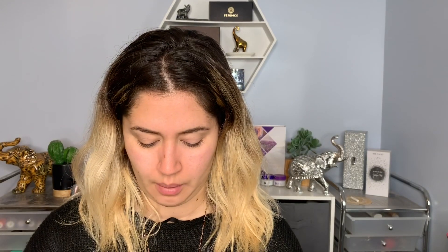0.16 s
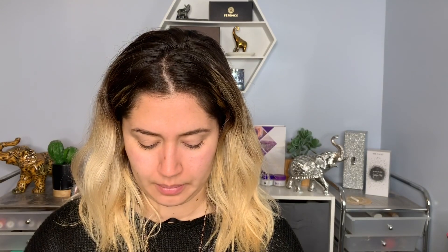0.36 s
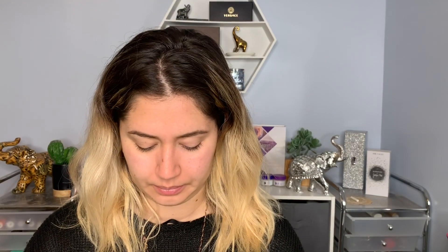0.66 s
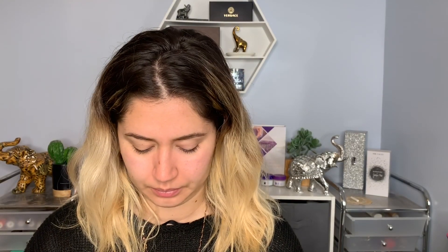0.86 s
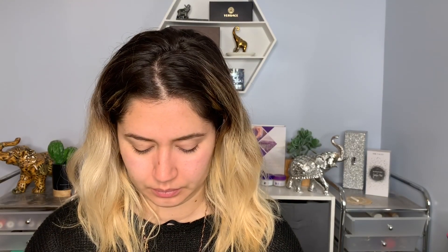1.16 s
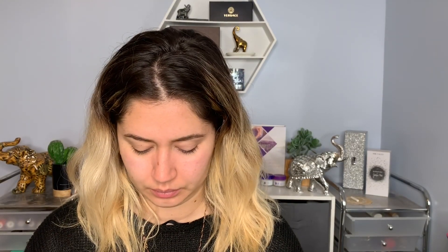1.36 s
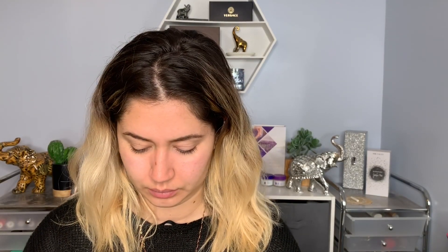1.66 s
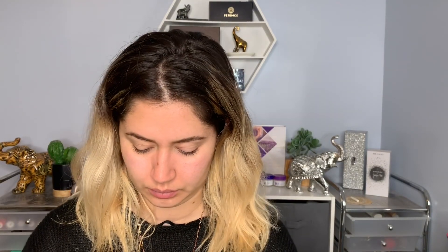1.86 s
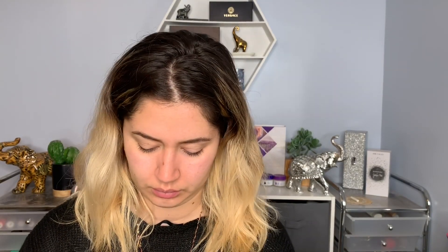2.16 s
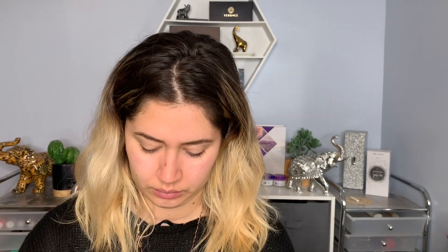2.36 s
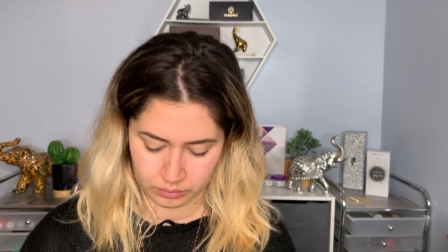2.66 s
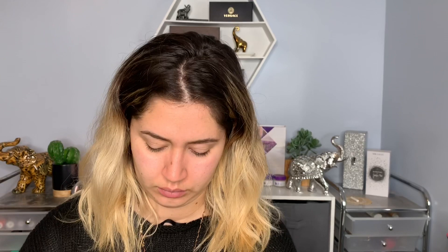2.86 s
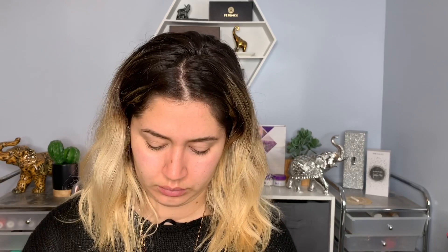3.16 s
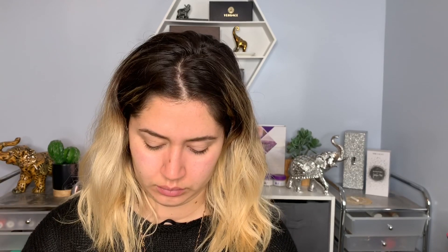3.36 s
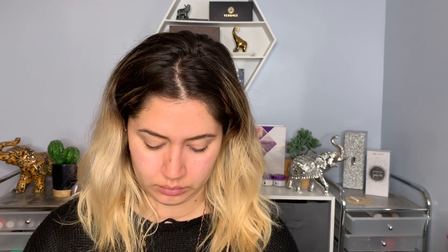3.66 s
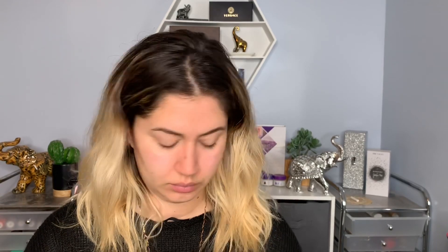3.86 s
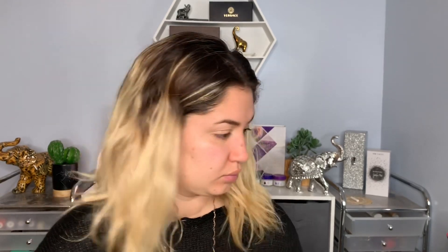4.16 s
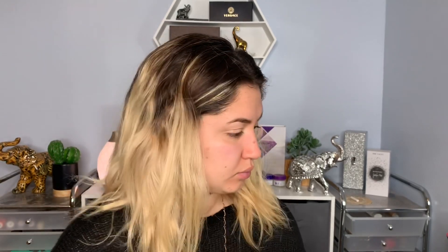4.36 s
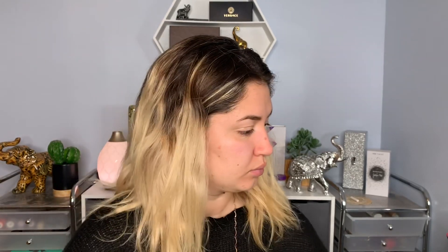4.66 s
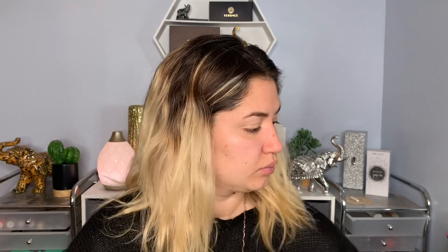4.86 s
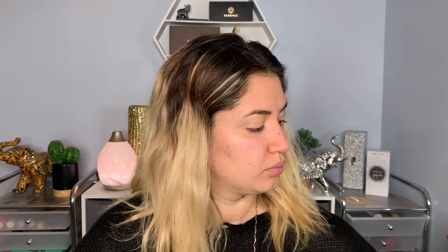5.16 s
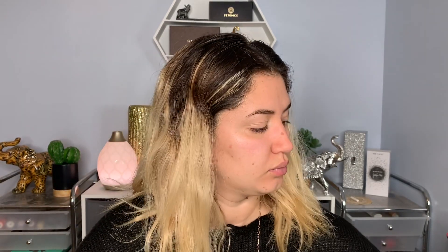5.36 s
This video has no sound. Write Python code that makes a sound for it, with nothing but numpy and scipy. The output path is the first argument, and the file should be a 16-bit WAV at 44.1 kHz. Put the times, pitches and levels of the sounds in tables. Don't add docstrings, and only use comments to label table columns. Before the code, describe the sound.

A quiet furnished room with faint, steady ventilation hum and a little microphone hiss. A barely audible tick opens it; at about 0.3 s a small plastic lid snaps off in a crisp cluster of clicks, rattling loose until 0.5 s. Near-silence follows, with a tiny tick at 1.6 s and a soft dull bump at 1.7 s. From 2.2 to 2.9 s a fingertip taps the jar six times, evenly, hollow and low with slight nail brightness and very faint skin squeaks. A soft hand or sleeve slide rises from 3 s to a firm set-down knock at 3.4 s. From 3.55 to 4 s the jar rocks on the desk in a hard clatter, the loudest event, landings coming ever faster before it stops. Hum alone remains until faint clicks at 5.2 s, then a short slide and small clinks at 5.4-5.5 s. Close stereo camera microphone, short room reflections.

```python
import sys
import numpy as np
from scipy import signal
from scipy.fft import rfft, irfft
from scipy.io import wavfile
from scipy.ndimage import uniform_filter1d

SR = 44100
rng = np.random.default_rng(int(sys.argv[2]) if len(sys.argv) > 2 else 0)


def file_out(sig):
    cols = np.atleast_2d(sig).T
    lim = np.clip(cols, -1, 1)
    pcm = np.round(lim * 32767).astype(np.int16)
    wavfile.write(sys.argv[1], SR, pcm)


def invert_db(level):
    return 10 ** (np.asarray(level, dtype=float) / 20)


N = 243192
SIZE = 8192
HZ = np.fft.rfftfreq(SIZE, 1 / SR)

# start_s, peak_db, pitch_hz (favoured)
LID_SNAPS = [(.321, -47, 3050), (.3282, -24, 3250), (.3305, -31, 5300), (.3345, -30.5, 3120),
             (.3365, -32, 500), (.342, -40, 4800), (.346, -38, 1250), (.351, -41, 5300), (.353, -36, 2900),
             (.356, -60, 400), (.360, -45.5, 3200), (.366, -54, 3200), (.374, -51, 1850), (.385, -46, 1250)]
ROCK_CONTACTS = [(3.5665, -18.5, 1390), (3.5677, -22.5, 2400), (3.5695, -20.5, 2440), (3.572, -23, 3060),
                 (3.5745, -24.5, 1390), (3.576, -26, 1070), (3.582, -26, 706), (3.589, -52, 1390),
                 (3.636, -25, 2170), (3.638, -14.5, 2170), (3.6425, -21, 1070), (3.6455, -38, 3060),
                 (3.652, -32, 1390), (3.672, -45, 2170), (3.6965, -19, 1390), (3.6995, -22, 1390),
                 (3.704, -27.5, 720), (3.708, -30.5, 1790), (3.7495, -22, 1790), (3.753, -19.5, 920),
                 (3.7565, -26, 720), (3.762, -41, 720), (3.798, -28, 1790), (3.8005, -20.5, 1390),
                 (3.8115, -28.5, 1250), (3.841, -21, 1070), (3.843, -26.5, 2170), (3.846, -21.5, 1070),
                 (3.852, -30.5, 1250), (3.8788, -19, 1500), (3.8865, -25, 930), (3.89, -32.5, 920),
                 (3.9125, -19.5, 1390), (3.917, -28, 2170), (3.921, -27.5, 720), (3.9401, -25, 2170),
                 (3.9432, -20, 1070), (3.9448, -26, 720), (3.949, -39, 720), (3.953, -40, 920),
                 (3.957, -38, 720), (3.9615, -29, 730), (3.9648, -24, 2170), (3.9684, -27.5, 3060),
                 (3.9738, -31, 720), (3.9772, -40, 1390), (3.9807, -32, 1790),
                 (3.549, -41, 600), (3.558, -46, 2400), (3.566, -34, 1390), (3.633, -28, 920),
               (3.692, -29, 1100), (3.694, -25.5, 720), (3.742, -32.5, 720), (3.7468, -29, 1390),
               (3.7951, -26, 1790), (3.8769, -30, 920), (3.907, -46, 600), (3.936, -37, 920),
               (3.987, -48, 720), (3.996, -45, 720), (4.007, -41.5, 530)]
CLINKS_ASIDE = [(5.383, -30, 2000), (5.3834, -28.5, 3130), (5.3856, -21.5, 2410), (5.3895, -36, 1950),
                (5.3928, -31.5, 1890), (5.4005, -50, 2000), (5.404, -44, 2410), (5.409, -37, 2000),
                (5.4125, -40, 1900), (5.423, -40, 2410), (5.429, -59, 2150)]
CLICKS_ASIDE = [(5.238, -51, 6100), (5.244, -50, 2180), (5.376, -46, 6000), (5.4603, -32, 3820),
                (5.4615, -38, 4650), (5.4625, -37, 2350), (5.469, -43.5, 2000), (5.4695, -41, 3750),
                (5.476, -46, 2350), (5.493, -35, 3020), (5.498, -39, 2400), (5.503, -44, 800)]

# start_s, peak_db, crack_db, tilt_db (treble)
LID_LIFT = [(.462, -34, -1, -3), (.4665, -39.5, 9, 11.5), (.4708, -25.5, 1.5, 4), (.477, -40, -9, -0.5),
            (.483, -39, 6, 9.5), (.493, -44, 6, 10), (.499, -39, 6.5, 5)]
FINGER_TAPS = [(2.2107, -30.5, 2, 1.5), (2.3644, -27.5, -1, 2), (2.4976, -27, 1.5, -4),
               (2.623, -21.5, -3.5, 4.5), (2.768, -23, 2.5, 0), (2.907, -24, 0.5, 3.5)]
JAR_THUDS = [(1.692, -33, -12, -7), (1.727, -52.5, 0, 1), (5.35, -55.5, 22, -37), (5.39, -48, 4, -27),
             (5.465, -46.5, -10.5, -42)]
JAR_SET_DOWN = [(3.381, -32, 2, -2), (3.3838, -21, 1, -3), (3.391, -28, -1.5, -2), (3.398, -32.5, 2, -8.5),
                (3.414, -33, -5, -19.5), (3.424, -41, -1, -23)]
SOFT_KNOCKS = [(.506, -39, -17, 15), (.515, -45, -6, -1), (.54, -53, -7, -20), (3.506, -47, -9, -12),
               (3.518, -40.5, -7, 2), (3.527, -45, -2, -5.5), (3.534, -41, -13, -8.5),
               (3.54, -42.5, -6, -14.5), (3.545, -45, -3, -4.5)]
BRIGHT_TICKS = [(0.0054, -52, -1.3, 25), (1.5668, -56, -1, -4), (1.741, -41, -0.96, -43),
                (3.547, -53, -1.2, 4), (3.5705, -38.5, -1, 26), (3.638, -31, -1.2, -12),
                (3.752, -42, -1, -10), (3.8, -48, -1, 16), (3.844, -49, -1, 0), (3.882, -54, -1, 3),
                (3.945, -41, -1, -10), (3.967, -31.5, -1, -14.5)]

# mode_hz, width_hz, level_db
SNAP_RING = [(355, 87, 2), (524, 20, -10), (800, 90, -2.5), (1250, 150, -10.5), (1850, 370, 3),
             (2414, 110, -9.5), (3056, 140, -2.5), (3200, 200, 1), (3325, 166, -6.5), (4320, 200, -12.5),
             (4800, 250, -3.5), (5300, 250, 2.5), (6220, 550, -23.5), (9300, 1800, -15)]
LIFT_RING = [(333, 33, 5), (517, 13, 8), (830, 240, 0.5), (1230, 19, -32), (1800, 134, 4), (3060, 180, 1),
             (3250, 40, -9), (4050, 44, -4), (4650, 140, -25), (4800, 150, -2.5), (5460, 170, -12),
             (6100, 200, -8), (9900, 173, -23)]
JAR_RING = [(155, 68, -2.5), (206.6, 39, 1.5), (348, 18, -1.5), (519, 24, 4.5), (714, 69, -7),
            (954, 18, -8), (1070, 23, -30), (1250, 50, -4.5), (1280, 44, -33), (1478, 25, -12),
            (1544, 300, -16), (1780, 130, -30)]
WALL_RING = [(1776, 87, 2), (2530, 170, -9.5), (3050, 98, -13), (3390, 67, -8.5), (3970, 66, -5),
             (4650, 170, -13), (5300, 140, -34), (6200, 280, -15), (6800, 240, -12.5)]
THUD_RING = [(86, 57, -11), (145, 87, -2), (266, 47, -2.5), (343, 52.5, 1.5), (582, 88, -10),
             (680, 77, -9.5), (1190, 96, -20)]
BASE_RING = [(514, 43, 4.5), (680, 40, 6.5), (1040, 50, -2), (1510, 110, 4), (1890, 100, 1),
             (2150, 70, 6.5), (2500, 134, -1.5), (2850, 120, -4.5), (3240, 64, -10.5), (4190, 65, -12),
             (4850, 130, -24)]
DESK_RING = [(387, 25, -1), (513, 30, -0.5), (733, 30, 1), (899.5, 40, -7.5), (1070, 45, -5.5),
             (1250, 67, -6), (1390, 66, -7.5), (1790, 36, 3), (2170, 110, 0), (2360, 16, 5.5),
             (2566, 50, -17), (3060, 60, -2.5), (4010, 220, -11), (4400, 120, -27.5)]
CLINK_RING = [(800, 210, -19), (1170, 120, -19), (1888, 74, 4), (2150, 280, -1.5), (2410, 150, -10.5),
              (3000, 122, -8.5), (3200, 160, -10.5), (4270, 210, -5.5), (4810, 150, -15), (5940, 300, -24),
              (8600, 400, -25)]
CLICK_RING = [(500, 150, -8), (800, 400, 1.5), (2000, 110, -3), (2350, 110, 3.5), (3100, 120, -4.5),
              (3840, 180, 1), (4650, 360, -3), (5630, 280, -8.5), (6850, 450, -11), (8700, 460, -13.5),
              (9800, 550, -23.5)]
KNOCK_RING = [(530, 200, 12.5), (740, 5, 21.5), (1610, 31, -3.5), (1720, 65, -46.5), (2190, 16, -28),
              (2550, 18, -2), (2560, 61, -33)]
TICK_RING = [(3960, 820, 16), (6670, 950, 7.8), (11800, 1900, 3.7)]

# freq_hz, level_db (per Hz)
LID_CRACKLE = [(59, -116), (100, -14), (524, 2.5), (1800, -1.5), (2690, -2.5), (3190, -6), (3620, -5.5),
               (10200, -24), (16000, -38)]
JAR_CRACKLE = [(60, -11.5), (200, -0.5), (700, -13), (1700, -21.5), (2400, -44.5), (4000, -42),
               (7000, -41.5), (13000, -52.5), (16000, -71)]
THUD_CRACKLE = [(29, -31), (50, -17), (150, 11), (220, 7), (349, -68), (453, -10), (1660, -62), (6000, -89),
                (7800, -85), (13200, -120)]
BASE_CRACKLE = [(59, -55), (100, -8.5), (705, 3), (1170, -16.5), (2520, -6.5), (3700, -18), (11600, -41),
                (13200, -55), (16000, -86.5)]
DESK_CRACKLE = [(120, -34.5), (250, 2), (400, -9.5), (700, 6.5), (1400, 8.5), (2200, -4), (3100, 4.5),
                (4600, -13), (7500, -19.5), (10500, -27), (12500, -62.5)]
CLINK_CRACKLE = [(59, -34), (100, -15.5), (452, -13.5), (784, 2.5), (1080, -1), (1910, -4.5), (2750, -18),
                 (4670, -20), (13200, -23), (16000, -50)]

# time_s, level_db
RIM_ROLL = [(3.495, -72), (3.53, -55.5), (3.555, -46.5), (3.6, -58), (3.88, -54), (3.96, -42.5), (4.0, -55),
            (4.02, -68)]
# start_s, length_s, pitch_hz, end_pitch_hz, level_db
SKIN_SQUEAKS = [(2.502, 0.064, 7160, 6450, -80), (2.498, 0.098, 6100, 4900, -84),
                (2.685, 0.05, 6630, 6420, -78), (2.724, 0.044, 6600, 6400, -80)]
# time_s, level_db
HAND_SLIDES = [
    [(2.98, -104), (3.15, -75), (3.3, -65.5), (3.38, -59.5), (3.42, -83)],
    [(5.08, -80), (5.33, -75), (5.37, -63), (5.51, -82)],
]
# freq_hz, level_db (per Hz)
FRICTION_COLOUR = [(150, -47), (300, 0), (1200, -12.5), (3500, -19.5), (6000, -33), (10500, -38.5),
                   (14300, -58), (15000, -87)]

# delay_ms, left_db, right_db
EARLY_ECHOES = [(2.1, -10, -38), (2.8, -7.5, -29.5), (5.5, -16, -5), (8.2, -48, -16.5), (11., -19, -33),
                (18., -14, -13.5)]
# freq_hz, t60_s
ROOM_DECAY = [(100, 0.53), (300, 0.26), (1000, 0.23), (3000, 0.27), (8000, 0.28), (15000, 0.029)]
# freq_hz, level_db (per Hz)
VENT_COLOUR = [(20, -56), (53, -6.5), (161, -7.5), (406, -5.5), (572, -9), (920, -4.5), (1330, -11),
               (1690, -12), (1900, -17.5), (3100, -25), (5200, -32.5), (11000, -40), (14300, -90),
               (22000, -120)]
# mode_hz, width_hz, level_db
DUCT_RING = [(60, 36, 1), (394, 30, -1), (622, 16, -1), (1093, 60, -4), (1445, 60, -13), (1628, 20, 0),
             (1701, 30, -8), (2190, 70, -15), (2440, 45, -15), (3530, 240, -23), (4330, 200, -29)]
# freq_hz, likeness (-1 to 1)
HUM_LIKENESS = [(60, 0.7), (130, 0.94), (290, 0.85), (640, 0.14), (1410, -0.0085), (3100, 0.71),
                (6820, 0.077), (15000, -0.16)]
# freq_hz, level_db (per Hz)
MIC_NOISE = [(30, -52), (3000, -44), (9000, -41.5), (14300, -37), (14600, -66)]
# freq_hz, gain_db
MIC_COLOUR = [(30, -15.5), (50, -4), (11300, 4.5), (11650, -12.5), (12150, -10.5), (12450, 4.5), (15000, 5),
              (16000, -1.5)]


def lid_snap():
    return spotted(LID_SNAPS, SNAP_RING, LID_CRACKLE, crack_db=-2, spot_db=11.7, spot_octaves=0.12,
                   slope_db=1.4, lag_ms=0.274, pan_db=-0.49, chatter_ms=1.6, chatter_db=-7,
                   rise=0.15, damping=1.2, detune=0.0062, low_hz=130)


def lid_lift():
    return strikes(LID_LIFT, LIFT_RING, LID_CRACKLE, lag_ms=0.027, pan_db=-0.22, chatter_ms=2.3,
                   chatter_db=4.9, rise=0.7, late_ms=-0.3, damping=1.6)


def finger_taps():
    taps = strikes(FINGER_TAPS, JAR_RING, JAR_CRACKLE, lag_ms=0.07, pan_db=-0.31, chatter_ms=6.3,
                   chatter_db=-4, rise=0.15, late_ms=0.34, damping=0.92, detune=0.013,
                   stiff_hz=1500, spread_ms=2.53, low_hz=41.8)
    nail_rows = [(s, db - 15.5, -40, 0) for s, db, *_ in FINGER_TAPS]
    nail = strikes(nail_rows, WALL_RING, JAR_CRACKLE, lag_ms=0.07, pan_db=-0.2, chatter_ms=3.1,
                   chatter_db=-1, rise=0.14, late_ms=0.3, damping=1.8, detune=0.018, vary_db=4.0)
    return taps + nail


def thuds():
    return strikes(JAR_THUDS, THUD_RING, THUD_CRACKLE, lag_ms=0.1, pan_db=-0.3, chatter_ms=14.0,
                   chatter_db=-3.0, late_ms=-1.14, damping=0.63, spread_ms=2.3, low_hz=35.2)


def set_down():
    return strikes(JAR_SET_DOWN, BASE_RING, BASE_CRACKLE, lag_ms=0.028, pan_db=0.27, chatter_ms=3.5,
                   chatter_db=-10, rise=0.39, damping=2.5, spread_ms=0.04)


def rocking():
    return spotted(ROCK_CONTACTS, DESK_RING, DESK_CRACKLE, crack_db=-3, spot_db=14,
                   spot_octaves=0.093, slope_db=6.5, lag_ms=0.081, pan_db=0.18, chatter_ms=0.96,
                   chatter_db=-2.7, rise=0.81, late_ms=-0.3, damping=2.2, spread_ms=0.4,
                   detune=0.023, high_hz=7550, low_hz=295)


def rim_roll():
    bumps = rng.standard_normal(N) * rng.standard_normal(N)
    body = ringing(DESK_RING, 1.2, 0.0081) + invert_db(-13.0) * causal(read(DESK_CRACKLE, HZ))
    body = body * causal(-7.5 * np.log2(HZ / 700 + 1))
    body = body * (1j * HZ / (260 + 1j * HZ)) ** 2
    rumble = signal.oaconvolve(bumps[None], irfft(body), axes=1)[:, :N]
    return level(RIM_ROLL) * evened(rumble)


def clinks_aside():
    clinks = spotted(CLINKS_ASIDE, CLINK_RING, CLINK_CRACKLE, crack_db=-3.5, spot_db=18,
                     spot_octaves=0.13, slope_db=4.9, lag_ms=-0.375, pan_db=0.78, chatter_ms=1.3,
                     chatter_db=-1.5, rise=0.05, damping=1.9, detune=0.0036)
    clicks = spotted(CLICKS_ASIDE, CLICK_RING, CLINK_CRACKLE, crack_db=1.4, spot_db=12.6,
                     spot_octaves=0.15, slope_db=6.4, lag_ms=-0.358, pan_db=2.7, chatter_ms=2.6,
                     chatter_db=-1.5, rise=0.11, damping=1.03, detune=0.0045)
    knocks = strikes(SOFT_KNOCKS, KNOCK_RING, JAR_CRACKLE, lag_ms=0.023, pan_db=-0.3,
                     chatter_ms=5.1, chatter_db=-1.3, damping=2.1)
    ticks = strikes(BRIGHT_TICKS, TICK_RING, CLINK_CRACKLE, lag_ms=0.024, pan_db=0.023,
                    chatter_ms=7.0, chatter_db=3.1)
    return clinks + clicks + knocks + ticks


def squeaks():
    out = np.zeros(N)
    for s, length, hz, end_hz, db in SKIN_SQUEAKS:
        u = np.arange(0, length, 1 / SR) / length
        wobble = evened(uniform_filter1d(rng.standard_normal(SR), size=200))
        flutter = 1 + 0.41 * wobble[:len(u)]
        tone = np.sin(2 * np.pi * np.cumsum(hz + (end_hz - hz) * u) / SR)
        out[round(s * SR):][:len(u)] += invert_db(db) * np.sin(np.pi * u) * flutter * tone
    return out


def slide():
    colour = irfft(causal(read(FRICTION_COLOUR, HZ)))
    hiss = signal.oaconvolve(rng.standard_normal((2, N)), colour[None], axes=1)
    return invert_db(1.0) * sum(level(rows) for rows in HAND_SLIDES) * evened(hiss[:, :N])


def spotted(rows, modes, crack, crack_db, spot_db, spot_octaves, slope_db, **contact):
    hz, width, db = np.transpose(modes)
    out = np.zeros((2, N))
    for s, peak_db, spot_hz in rows:
        favour_db = spot_db / (1 + (np.log2(hz / spot_hz) / spot_octaves) ** 2)
        row = (s, peak_db, crack_db, slope_db * np.log2(spot_hz / 1900))
        out += strikes([row], np.transpose([hz, width, db + favour_db]), crack, **contact)
    return out


def strikes(rows, modes, crack, lag_ms, pan_db, chatter_ms, chatter_db, rise=0.42, late_ms=0.048,
            damping=1.0, spread_ms=0.4, detune=0.026, low_hz=240, high_hz=19000, vary_db=3.53,
            stiff_hz=2500):
    out = np.zeros((2, N + SIZE))
    t = np.arange(SIZE) / SR - 0.02
    ports = np.exp(-2j * np.pi * HZ * lag_ms / 1000 * np.array([[1], [0]]))
    ports = ports * invert_db(pan_db * np.array([[0.5], [-0.5]]))
    path = np.exp(-2j * np.pi * spread_ms * np.log((1 + HZ / 120) / (1 + HZ / stiff_hz)))
    path *= (1j * HZ / (low_hz + 1j * HZ)) ** 2
    path /= (1 + 1j * HZ / high_hz) ** 2
    octaves = np.log2(HZ / 1000 + 0.05) / 3
    span = max(chatter_ms, 0.2) / 1000
    envelope = np.exp(np.where(t < 0, t / rise, -t) / span)
    click = np.arange(SIZE) == np.argmin(abs(t))
    for s, peak_db, crack_db, tilt_db in rows:
        burst = envelope * rng.standard_normal(SIZE) * rng.standard_normal(SIZE)
        force = invert_db(chatter_db) * burst / np.linalg.norm(burst) + click
        body = ringing(modes, damping, detune, vary_db) + invert_db(crack_db) * causal(read(crack, HZ))
        sound = irfft(whitened(rfft(force)) * body * causal(tilt_db * octaves) * path * ports)
        at = round((s + late_ms / 1000 + t[0]) * SR)
        out[:, max(at, 0):at + SIZE] += invert_db(peak_db) * sound[:, max(-at, 0):] / abs(sound.mean(0)).max()
    return out[:, :N]


def ringing(modes, damping, detune, vary_db=7.7):
    hz, width, db = np.transpose(modes)[:, :, None]
    shift, spot, left, right = rng.standard_normal((4, len(modes)))
    hz = hz * (1 + detune * shift[:, None])
    loss = width * damping
    sign = (-1.) ** np.arange(len(modes))[:, None]
    shape = sign * loss * hz / (hz ** 2 - HZ ** 2 + 1j * loss * HZ)
    return invert_db(db.T + vary_db * spot + 1.4 * np.array([left, right])) @ shape


def whitened(spectrum, size=30):
    power = uniform_filter1d(abs(spectrum) ** 2, size=size)
    return spectrum * causal(-10 * np.log10(power + 1e-12))


def causal(db):
    cepstrum = irfft(np.maximum(db, -100) * np.log(10) / 20)
    cepstrum[1:SIZE // 2] *= 2
    cepstrum[SIZE // 2 + 1:] = 0
    return np.exp(rfft(cepstrum))


def read(points, hz):
    f, value = np.transpose(points)
    return np.interp(np.log(hz + 1), np.log(f + 1), value)


def level(rows):
    s, db = np.transpose(rows)
    return invert_db(np.interp(np.arange(N) / SR, s, db, -120, -120))


def evened(x):
    return x / np.sqrt(np.mean(abs(x) ** 2) + 1e-20)


def room(x, spread, wet_db=-11, start_ms=7):
    early = np.zeros((2, 2048))
    early[:, 0] = 1
    for ms, *db in EARLY_ECHOES:
        dull = np.hanning(7)[1:-1] / 3
        early[:, round(ms * SR / 1000):][:, :5] = np.outer(invert_db(np.array(db)), dull)
    out = signal.oaconvolve(x, early, axes=1)[:, :N]
    turn = np.arange(N) / SR * 7.356
    for k in range(3):
        taps = np.zeros((2, SR // 2))
        jitter = rng.integers(0, 20, (2, (SR // 2 - 1) // 20))
        at = np.arange(0, SR // 2 - 20, 20) + jitter
        np.put_along_axis(taps, at, rng.choice([-1., 1.], at.shape), 1)
        taps += 0.076 * taps[::-1]
        hz, t, z = signal.stft(taps, SR, nperseg=256)
        decay = invert_db(-60 * t / read(ROOM_DECAY, hz)[:, None])
        tail = signal.istft(z * decay, SR, nperseg=256)[1]
        tail *= 1 - np.exp(-np.arange(tail.shape[1]) / SR * 1000 / start_ms)
        tail /= np.linalg.norm(tail[0])
        share = np.sqrt(2 / 3) * np.cos(turn + k * np.pi / 3)
        out += invert_db(wet_db) * signal.fftconvolve(share * spread, tail, axes=1)[:, :N]
    return out


def close_ports(x, corner_hz=240):
    mid, side = x.mean(0), (x[0] - x[1]) / 2
    b, a = signal.butter(3, corner_hz, "high", fs=SR)
    side = signal.lfilter(b, a, side)
    return np.array([mid + side, mid - side])


def hum():
    frames, hz = N // 512 + 5, np.fft.rfftfreq(2048, 1 / SR)
    a, b, c, d, patches = rng.standard_normal((frames, 1025, 5)).T
    patches = uniform_filter1d(patches, size=20, axis=0)
    patches = evened(uniform_filter1d(patches, size=8, axis=1))
    same = np.clip(read(HUM_LIKENESS, hz), -1, 1)[:, None]
    left, other = a + 1j * b, c + 1j * d
    z = np.array([left, same * left + np.sqrt(1 - same ** 2) * other])
    ducts = sum(invert_db(db) ** 2 / (1 + (2 * (hz - f) / width) ** 2) ** 2.9 for f, width, db in DUCT_RING)
    air = invert_db(read(VENT_COLOUR, hz) - 5.5) ** 2
    hiss = invert_db(read(MIC_NOISE, hz)) ** 2
    z *= np.sqrt(ducts + air + hiss)[:, None]
    z *= invert_db(1.5 * patches)
    noise = signal.istft(z, nperseg=2048, noverlap=1536)[1][:, :N]
    return invert_db(-65.5) * evened(noise)


def scene():
    snap = lid_snap()
    jar = finger_taps() + thuds() + set_down()
    rest = lid_lift() + jar + rocking() + clinks_aside() + rim_roll() + squeaks()
    softened = invert_db(-6) * snap
    contacts = close_ports(room(snap + rest, softened + rest))
    return invert_db(-1.0) * contacts + slide() + hum()


def low_pass(x):
    return signal.sosfilt(signal.butter(12, 16520, fs=SR, output="sos"), x)


def record(dry):
    colour = irfft(causal(read(MIC_COLOUR, HZ)))
    heard = signal.oaconvolve(dry, colour[None], axes=1)[:, :N]
    return low_pass(heard)


dry = scene()
out = record(dry)
file_out(out)
```